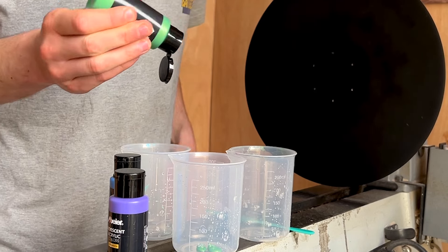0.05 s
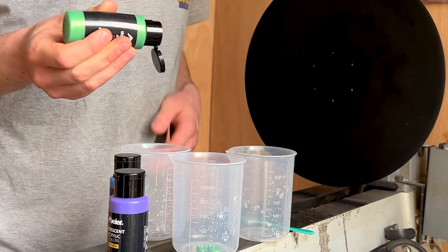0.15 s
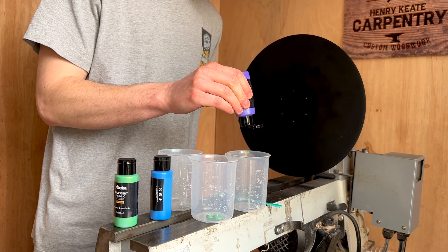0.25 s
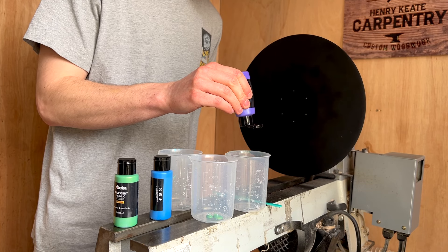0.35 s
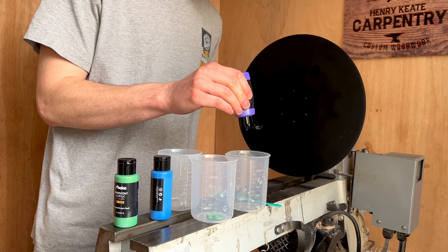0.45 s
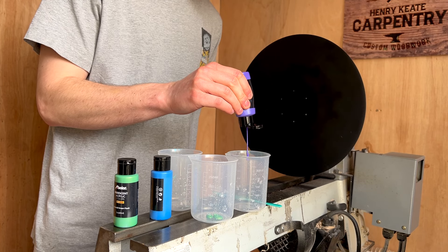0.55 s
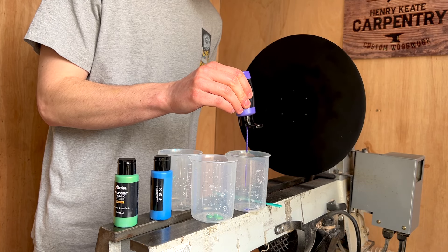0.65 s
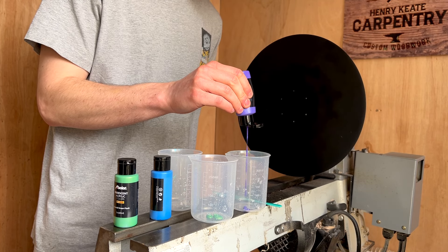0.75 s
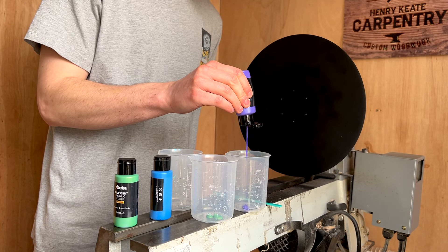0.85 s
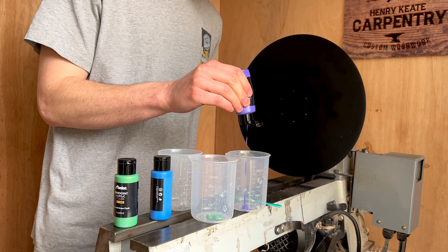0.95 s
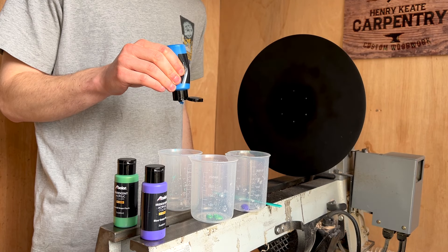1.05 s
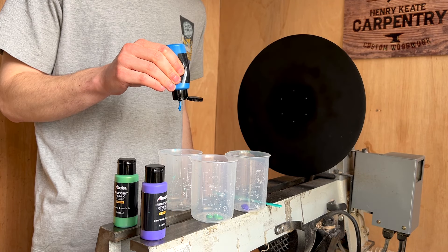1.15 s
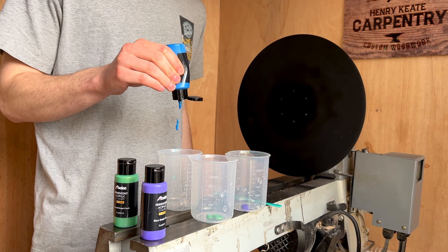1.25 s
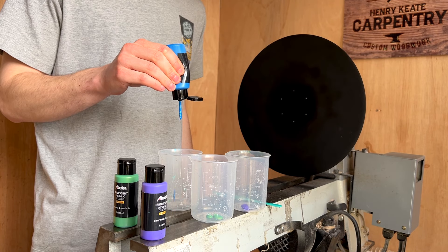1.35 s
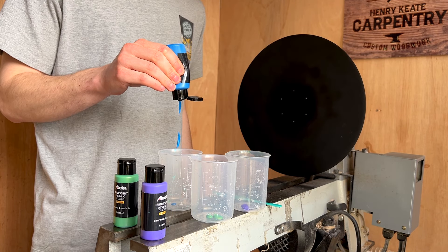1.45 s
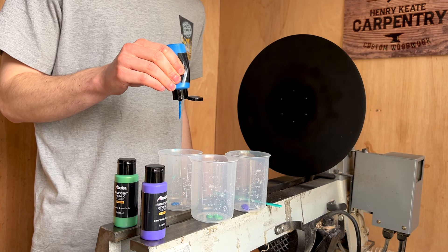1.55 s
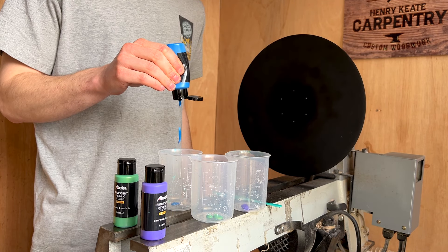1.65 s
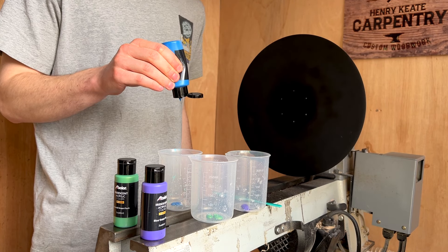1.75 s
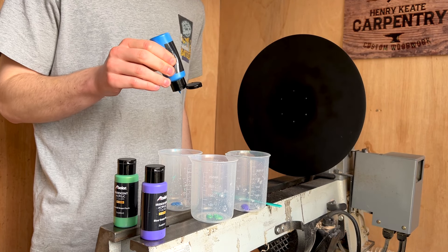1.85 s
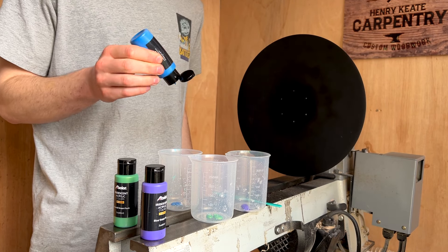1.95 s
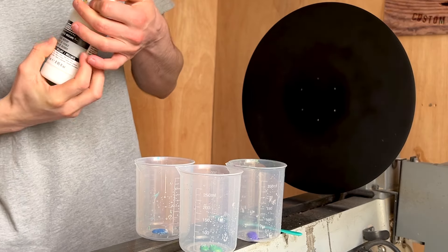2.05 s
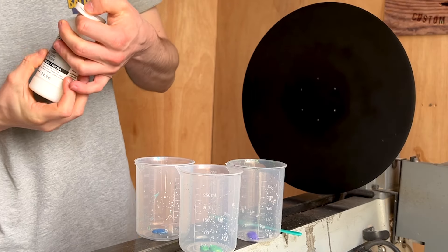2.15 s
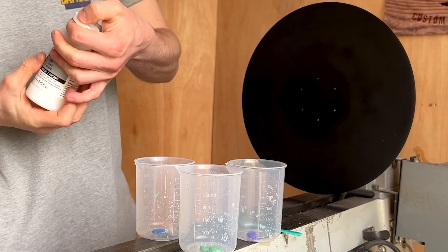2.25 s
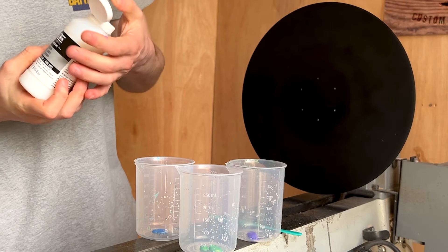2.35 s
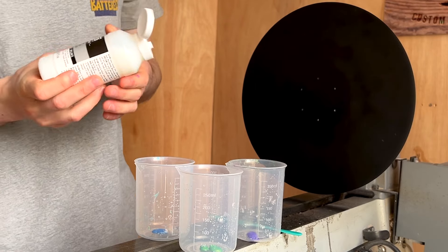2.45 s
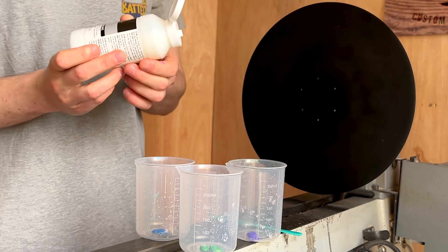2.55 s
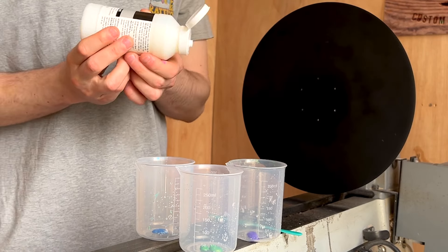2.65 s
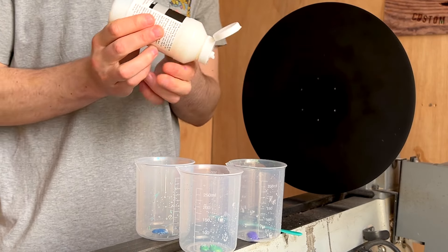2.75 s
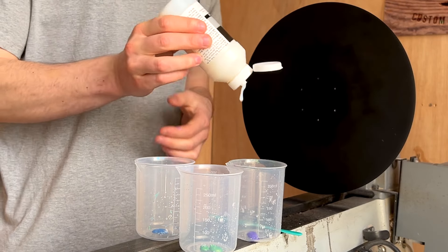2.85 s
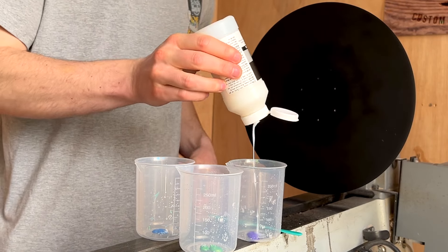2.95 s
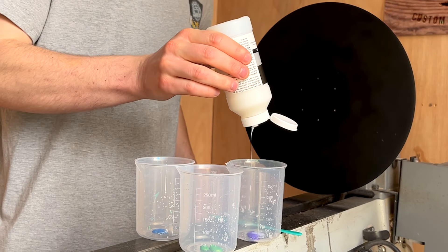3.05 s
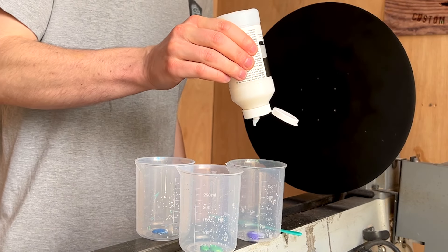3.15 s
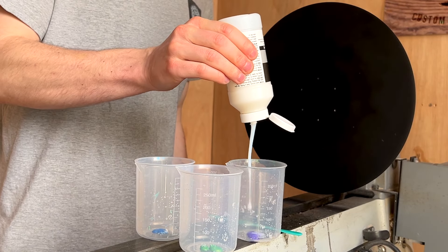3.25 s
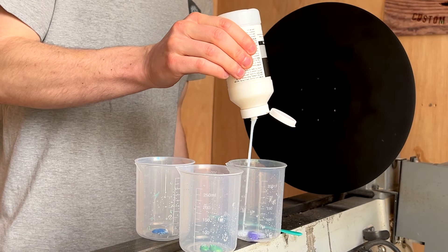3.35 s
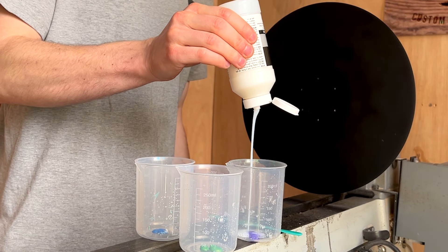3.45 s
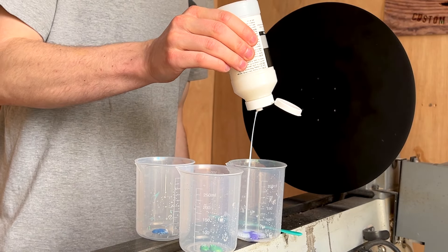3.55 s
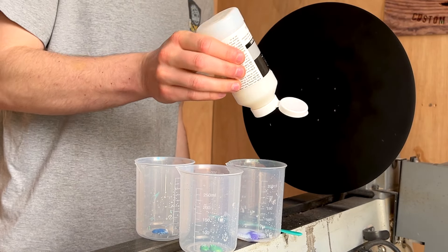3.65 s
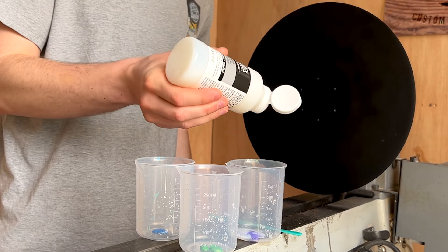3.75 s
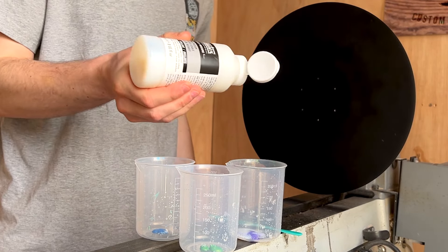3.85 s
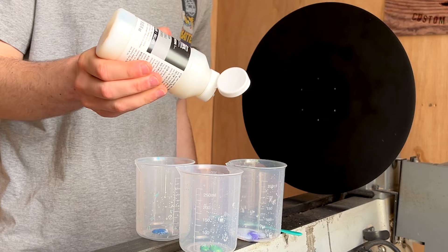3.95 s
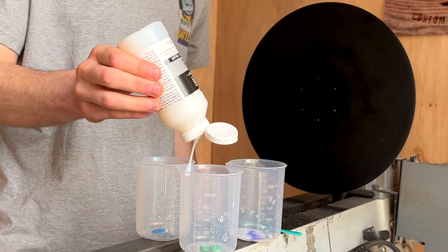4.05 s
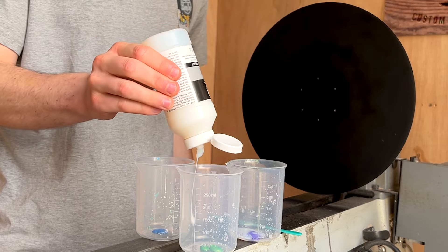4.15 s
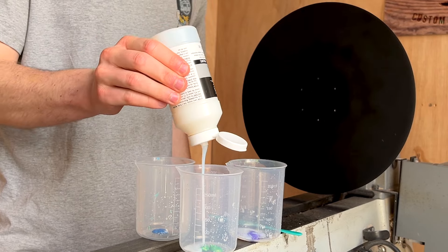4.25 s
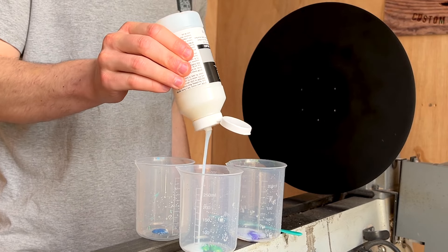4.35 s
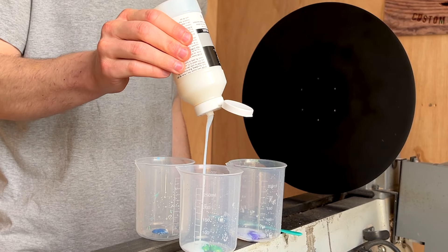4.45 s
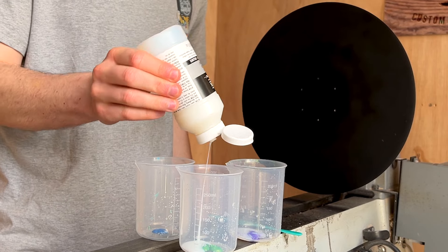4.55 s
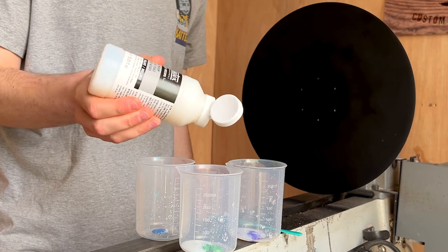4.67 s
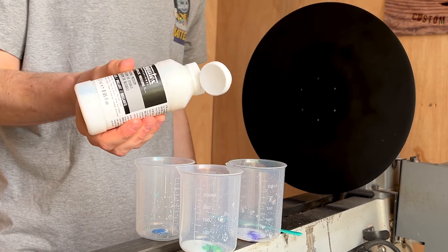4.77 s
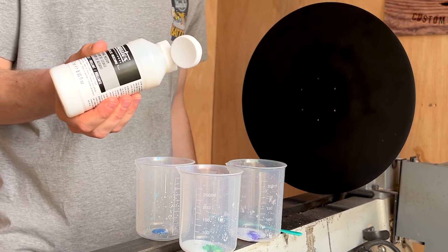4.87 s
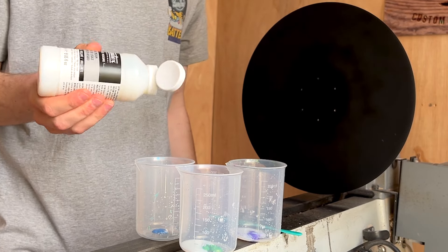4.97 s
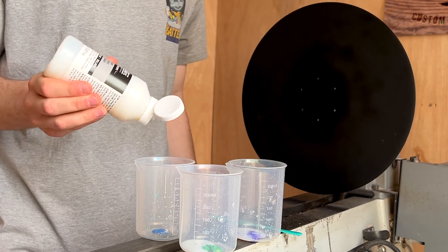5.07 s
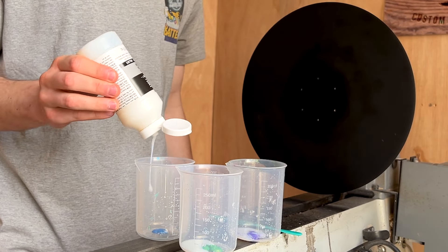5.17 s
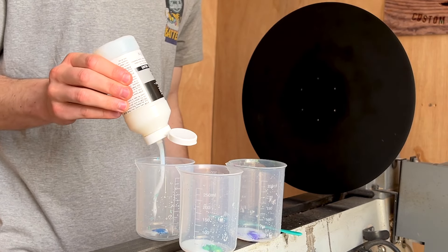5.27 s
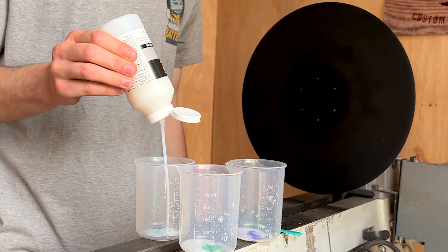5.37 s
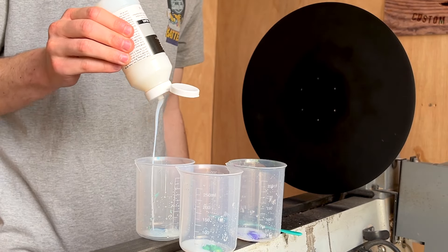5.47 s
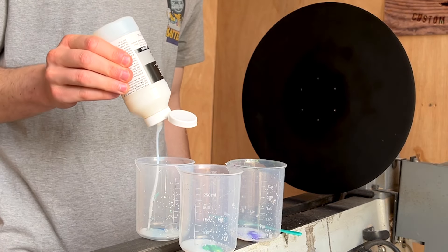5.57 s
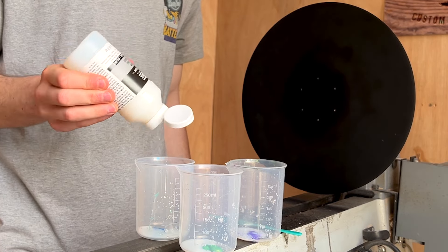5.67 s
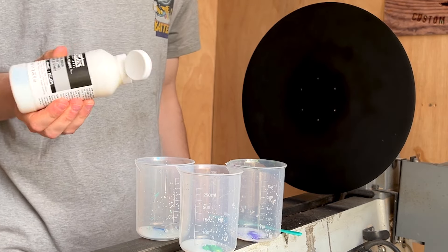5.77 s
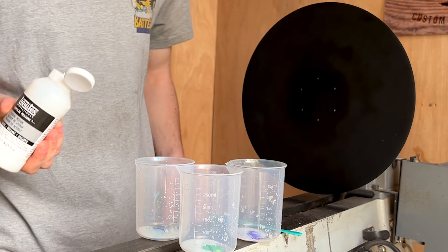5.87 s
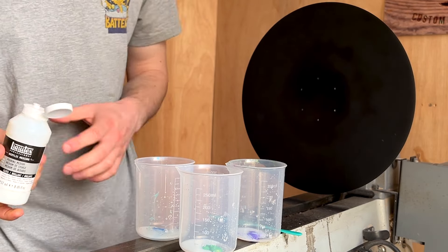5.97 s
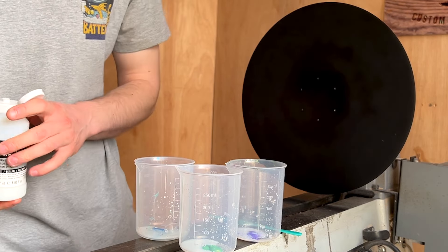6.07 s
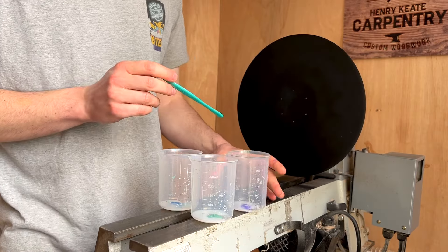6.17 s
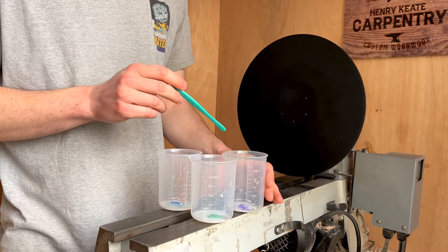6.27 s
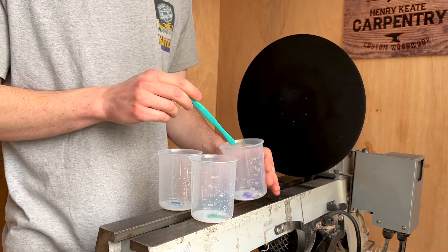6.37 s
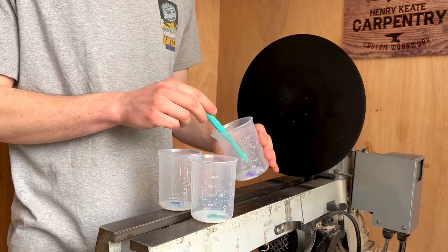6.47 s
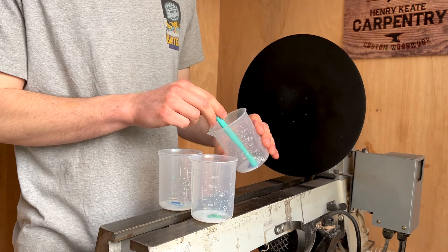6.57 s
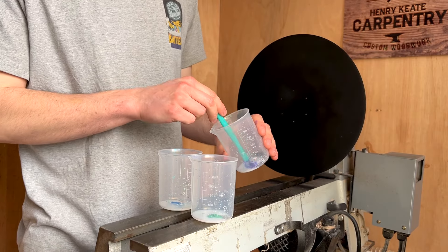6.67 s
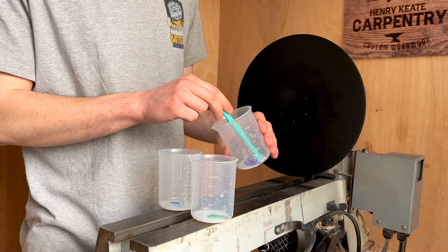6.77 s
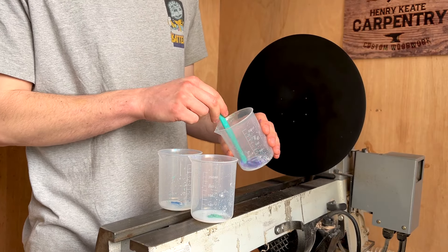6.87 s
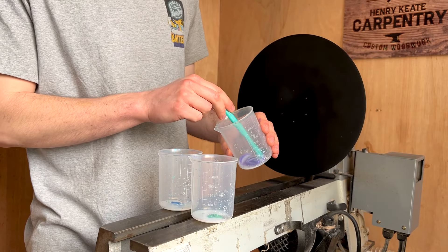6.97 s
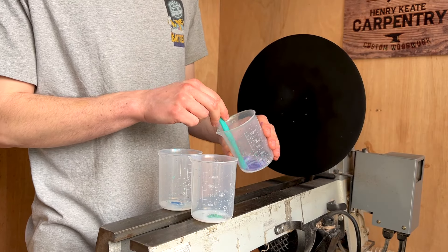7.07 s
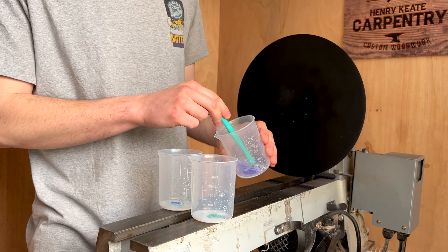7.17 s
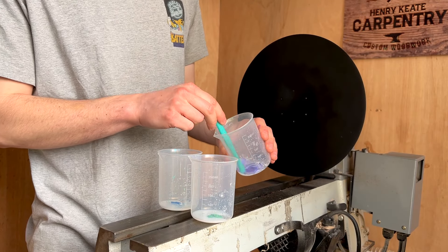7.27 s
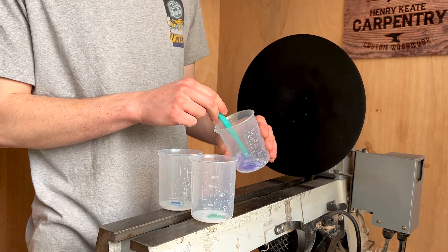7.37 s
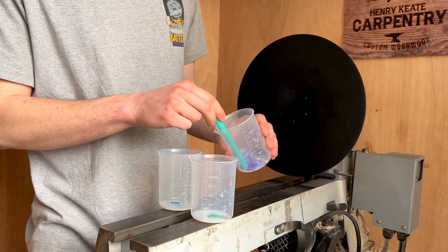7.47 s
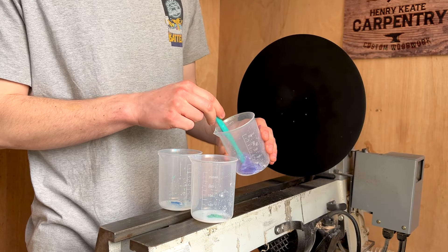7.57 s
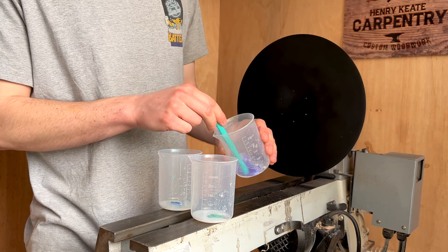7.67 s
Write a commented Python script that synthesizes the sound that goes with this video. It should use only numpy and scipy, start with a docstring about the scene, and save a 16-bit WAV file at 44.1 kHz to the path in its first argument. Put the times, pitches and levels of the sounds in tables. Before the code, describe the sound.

A small wooden workshop heard closely in stereo, with short dull echoes, quiet low rumble and air. A very faint hiss opens the first 0.3 seconds. Squeezed plastic bottles click softly at about 0.5, 0.65, 1.0, 1.4 and 1.55 seconds; at 1.7 a nozzle spits and splutters wetly. From 2.0 to 6.1 medium is poured: light rustles, a soft bump near 2.5, a barely audible squeak at 2.7, sparse bottle ticks at 3.0, 3.3, 4.3 and 5.2, and tiny rising wet pops around 3.5. A low hum gradually swells, then cuts off at 6.1. Light beaker taps come between 5.9 and 6.3, with rustling and a deep bump at 6.2. At 6.54 a stick gives the loudest hollow plastic knock, then stirs to the end, clustered knocks and gritty, ringing scrapes repeating roughly five times a second.

```python
"""In a small wooden workshop, paint is squeezed from plastic bottles into beakers: bottles click as resonant
shells, a nozzle sputters in bursts of tiny impacts, hands rustle and a few wet pops rise in pitch. After four
light knocks on beakers, a plastic stick stirs one of them: damped modes knock its bottom and stick-slip rubs
its wall five times a second. Near surfaces return dull echoes and the room rings briefly. Shaped noise gives a
faint opening hiss, rumble and air; the background changes at 2.045 s, a hum swells, and at 6.125 s the
background steps back."""
import sys
import numpy as np
from scipy import signal
from scipy.fft import rfft, irfft
from scipy.io import wavfile
from scipy.ndimage import uniform_filter1d

SR = 44100
rng = np.random.default_rng(int(sys.argv[2]) if len(sys.argv) > 2 else 0)


def digitize_waveform(pressure):
    """Quantize a signal to 16-bit integers and store it at the path in sys.argv[1].

    Rows of a 2-D input are taken as channels; values are limited to [-1, 1].
    """
    field = np.atleast_2d(pressure).T
    bounded = np.clip(field, -1, 1)
    quanta = np.round(bounded * 32767).astype(np.int16)
    wavfile.write(sys.argv[1], SR, quanta)


N = 340452
T = np.arange(N) / SR
RING = T[:8192]  # time axis of one hit


def undb(db):
    """Level law: decibels to amplitude gain."""
    return 10 ** (np.asarray(db) / 20)


def along(points, hz):
    """Logarithmic frequency scale: interpolate (frequency_hz, value) points on it."""
    f, value = np.transpose(points)
    return np.interp(np.log(np.maximum(hz, 1)), np.log(f), value)


def impulse(points, size=1024):
    """Minimum phase: folding the cepstrum gives the most compact causal click of a spectrum, at unit energy."""
    hz = np.arange(size // 2 + 1) * SR / size
    log_gain = along(points, hz) * np.log(10) / 20
    cepstrum = irfft(log_gain)
    cepstrum[1:size // 2] *= 2
    cepstrum[size // 2 + 1:] = 0
    h = irfft(np.exp(rfft(cepstrum)))
    return h / np.linalg.norm(h)


def through(x, response):
    """Linear system: convolve a sound with an impulse response."""
    return signal.fftconvolve(x, response)[:len(x)]


def blow(x, count=132):
    """Short-time power: scale a hit so that its loudest 3 ms (132 samples) have rms 1."""
    power = uniform_filter1d(x ** 2, count, mode="constant")
    return x / np.sqrt(power.max())


def add(track, start_s, x):
    """Superposition: mix x into the track from start_s."""
    i = int(start_s * SR)
    track[i:i + len(x)] += x[:max(N - i, 0)]


def fade(t60):
    """Exponential damping: amplitude falls by 60 dB in t60 seconds."""
    return np.exp(-np.log(1000) * RING / t60)


def ring(modes, scatter_db=3, detune=0.013):
    """Modal excitation: a random striking spot sets level and sign; fingers and paint shift pitch a little."""
    chance = rng.standard_normal((len(modes), 3))
    total = 0
    for (hz, db, t60), (level, shift, sign) in zip(modes, chance):
        gain = undb(db + scatter_db * level) * np.sign(sign)
        pitch_hz = hz * (1 + detune * shift)
        total = total + gain * fade(t60) * np.sin(2 * np.pi * pitch_hz * RING)
    return total


def throb(hz, swell_s, steep):
    """Heavy damping: an oscillation peaks at swell_s and soon dies."""
    u = RING / swell_s
    envelope = (u * np.exp(1 - u)) ** abs(steep)
    return envelope * np.sin(2 * np.pi * hz * RING)


def crack(colour, t60):
    """Contact noise: a decaying random burst takes on a spectrum."""
    burst = rng.standard_normal(len(RING)) * fade(t60)
    return blow(through(burst, impulse(colour)))


def slips(rate, spread_db):
    """Shot noise: random impacts, on average rate per second, of uneven size and either sign, at rms 1."""
    happens = rng.random(N) < rate / SR
    size = undb(spread_db * np.clip(rng.standard_normal(N), -2, 2))
    x = happens * rng.choice([-1, 1], N) * size
    return x / x.std()


def swell(peak_s, rise, fall, db):
    """Gaussian envelope: a smooth rise to a level and fall from it, with widths in seconds."""
    width = np.where(T < peak_s, rise, fall)
    return undb(db) * np.exp(-.5 * ((T - peak_s) / width) ** 2)


def wander(rate):
    """Random modulation: straight lines join normal random values drawn rate times per second."""
    k = int(SR / rate)
    knots = N // k + 2
    return np.interp(T, np.arange(knots) * k / SR, rng.standard_normal(knots))


def air(colour, db, wide_hz=450):
    """Diffuse-field coherence: steady noise is alike on both sides in the bass and wide well above wide_hz."""
    hz = np.arange(N // 2 + 1) * SR / N
    mid, side = rfft(rng.standard_normal((2, N))) * undb(along(colour, hz))
    mid, side = irfft(mid, N), irfft(side * hz / (hz + abs(wide_hz)), N)
    return np.array([mid + side, mid - side]) * undb(db) / mid.std()


# noise spectrum before 2.045 s and after 6.125 s: frequency_hz, relative density_db
EARLY_AIR = [(15, -33), (25, -7.5), (66, -2.5), (278, -21.5), (301, -29), (326, -25.5), (833, -36.5),
             (1720, -42.5), (8100, -49.5), (10000, -58), (15000, -47)]
# noise spectrum from 2.045 s to 6.125 s: frequency_hz, relative density_db
MIDDLE_AIR = [(15, -97), (25, -35.5), (69, -7), (86, -12.5), (106, -2), (301, -16.5), (427, -21), (475, -24),
              (1760, -40), (3540, -45), (5420, -49.5), (10000, -49), (15000, -57)]
MIDDLE_START_S, MIDDLE_END_S = 2.045, 6.125
EARLY_DB, MIDDLE_DB, LATE_DB = -66, -65.5, -64  # rms of the part shared by both sides
HUM_HZ = 102.3
HUM_FAINT_DB, HUM_END_DB, HUM_SWELL_DB_PER_S = -79.5, -60, 7.5


def background():
    """Stationary noise and phase modulation: rumble and air, with a different noise and a wavering hum from
    2.045 s to 6.125 s."""
    middle = (T > MIDDLE_START_S) & (T < MIDDLE_END_S)
    rumble = air(EARLY_AIR, 0) * undb(np.where(T < MIDDLE_END_S, EARLY_DB, LATE_DB))
    waver = signal.resample(rng.standard_normal(64), N)
    # faint at first, then a steady swell until the background steps back
    hum_db = np.maximum(HUM_FAINT_DB, HUM_END_DB - HUM_SWELL_DB_PER_S * (MIDDLE_END_S - T))
    hum = np.sqrt(2) * np.sin(2 * np.pi * HUM_HZ * T + 0.5 * waver) * undb(hum_db)
    return np.where(middle, air(MIDDLE_AIR, MIDDLE_DB) + hum, rumble)


# echoes off the bench and near wall, left list then right: delay_s, level_db (before the colour below)
ECHOES = [
    [(.0139, 0), (.0178, -14)],
    [(.0128, -8), (.0194, -3.5)],
]
# echo spectrum: frequency_hz, level_db
ECHO_COLOUR = [(200, -10.5), (500, -10.5), (750, 0), (1000, -8), (1500, -11.5), (4000, -18.5), (12000, -29)]
# diffuse room: frequency_hz, level_db, t60_s
ROOM = [(100, -9, 0.37), (280, -2.5, 0.19), (720, -3, 0.21), (1470, -2.5, 0.18), (3330, -3, 0.2),
        (6900, 0.5, 0.19), (14000, -5, 0.13)]
# how much more the bench radiates to the left than to the right: frequency_hz, level_db
LEFT_BIAS = [(100, -0.5), (200, -10), (380, 13), (720, -14), (1300, 12), (2400, -3.5), (4400, 6),
             (8000, 4.5), (14000, 0)]
# phase by which the left microphone leads the right: frequency_hz, phase_rad
LEFT_LEAD = [(100, -0.35), (900, 1), (2200, 0.88), (4200, 1.5), (6300, 1.27), (9500, -3), (13000, -5.5),
             (16000, -8)]


def workshop(x, noise, echoes, side, build_s=0.0017):
    """Room response: direct sound, early reflections and diffuse decay at one microphone (1 left, -1 right)."""
    size = len(noise)
    t, hz = T[:size], np.arange(size // 2 + 1) * SR / size
    # each microphone takes half of the level and phase difference; the direct path lasts 20 samples
    bias = undb(side * along(LEFT_BIAS, hz) / 2)
    direct = bias * np.exp(.5j * side * along(LEFT_LEAD, hz) - 2j * np.pi * hz * 20 / SR)
    early = sum(undb(db) * np.exp(-2j * np.pi * hz * delay_s) for delay_s, db in echoes)
    h = irfft(direct + early * undb(along(ECHO_COLOUR, hz)))
    h[size // 2:] = 0  # near surfaces answer only early
    room = np.array(ROOM)
    spectrum = rfft(noise)
    edges = np.geomspace(40, 18000, 19)
    for lo, hi in zip(edges, edges[1:]):
        centre = np.sqrt(lo * hi)
        t60 = along(room[:, ::2], centre)
        band = irfft(spectrum * (hz >= lo) * (hz < hi))
        band = band * (1 - np.exp(-(t / build_s) ** 2)) * np.exp(-np.log(1000) * t / t60)
        share = np.sqrt(2 * (hi - lo) / SR)  # energy in proportion to bandwidth
        h = h + band / np.linalg.norm(band) * share * undb(along(room[:, :2], centre))
    return through(x, h)


SQUEAK_S, SQUEAK_HZ, SQUEAK_DB = 2.66, 2840, -79


def squeak(rise_s=.02, fall_s=0.027):
    """Stick-slip: a finger on the big bottle faintly excites one narrow resonance."""
    mode = fade(t60=0.011) * np.sin(2 * np.pi * SQUEAK_HZ * RING)
    skin = slips(rate=1500, spread_db=2) * swell(SQUEAK_S, rise_s, fall_s, SQUEAK_DB)
    return through(skin, mode / np.linalg.norm(mode))


POP_START_S, POP_END_S = 3.35, 3.72
POP_HZ, POP_DB = 1590, -68  # middle pitch, and upper limit of level


def stream(bend_per_s=3, count=5):
    """Bubble resonance: air pockets pop faintly in the thick stream as the medium runs out, rising in pitch."""
    out = np.zeros(N)
    for when, pitch, size in rng.random((count, 3)):
        hz = POP_HZ * 2 ** ((pitch - .5) / 2)  # within a quarter octave of the middle
        # bending the phase raises the pitch at twice bend_per_s
        blip = fade(t60=.03) * np.sin(2 * np.pi * hz * RING * (1 + bend_per_s * RING))
        add(out, POP_START_S + when * (POP_END_S - POP_START_S), undb(POP_DB - 7.1 * size) * blip)
    return out


# rustles of hands on plastic and cloth; the first row is a faint hiss at the start: start_s, length_s, level_db
RUSTLES = [(0, .28, -85), (2.032, .05, -73), (2.148, 0.16, -71), (2.547, .035, -77), (2.753, 0.097, -75),
           (5.922, .025, -67.5), (6.017, 0.096, -69), (6.13, 0.18, -63), (6.174, 0.033, -55),
           (6.376, 0.19, -80.5)]
# spectrum of rustle and opening hiss: frequency_hz, level_db
RUSTLE_COLOUR = [(150, 9.5), (400, 9.5), (800, 12.5), (1300, -1.5), (3000, -0.5), (6000, -2.5),
                 (9000, -2.5), (15500, -8)]
# dull bumps as things are handled: start_s, level_db, pitch_hz, swell_s
BUMPS = [(2.485, -27.5, 186, 0.0052), (2.48, -46, 473, 0.002), (6.203, -35, 222, 0.0045),
         (6.207, -24.5, 85.5, 0.011), (6.23, -32.5, 150, 0.0069)]
RUSTLE_ATTACK_S, RUSTLE_RELEASE_S = 0.012, .012  # linear rise, time constant of the decay


def hands(rustle_db=0, uneven_db=4, bump_hz=45):
    """Shot noise and damped oscillation: a faint opening hiss, uneven rustles of hands, and dull bumps."""
    strength = 0
    for start_s, length_s, db in RUSTLES:
        attack = np.clip((T - start_s) / RUSTLE_ATTACK_S, 0, 1)
        release = np.exp(-np.maximum(T - start_s - length_s, 0) / RUSTLE_RELEASE_S)
        strength = strength + undb(db) * attack * release
    grain = through(slips(rate=1600, spread_db=2.5), impulse(RUSTLE_COLOUR))
    rustle = grain * strength * undb(rustle_db + uneven_db * wander(rate=51))
    bumps = np.zeros(N)
    for start_s, db, hz, swell_s in BUMPS:
        add(bumps, start_s, undb(db) * throb(hz, swell_s, steep=2.96))
    # small objects radiate little deep bass
    return rustle + signal.sosfilt(signal.butter(2, bump_hz, "high", fs=SR, output="sos"), bumps)


# air spits through the nozzle, then wet paint splutters: peak_s, rise_s, fall_s, level_db, pops_per_s
SQUIRT = [(1.687, 0.0062, .012, -47.5, 3000), (1.709, 0.0097, 0.011, -44.5, 1000)]
# spectrum of the spit: frequency_hz, level_db
SPIT_COLOUR = [(120, -40), (200, -11), (683, 1), (1910, -1.5), (3370, -10.5), (8740, -11), (9580, -20),
               (10100, -39), (11300, -10.5), (16000, -15)]
# spectrum of the splutter: frequency_hz, level_db
SPLUTTER_COLOUR = [(120, -16), (300, -7), (700, -6), (1200, 3.5), (1900, -3.5), (2600, -11), (5000, -19),
                   (12000, -46)]


def nozzle():
    """Shot noise: fine spray, then coarser pops of paint bursting at the opening."""
    out = 0
    for (peak_s, rise, fall, db, rate), colour in zip(SQUIRT, [SPIT_COLOUR, SPLUTTER_COLOUR]):
        pops = slips(rate, spread_db=4.5) * swell(peak_s, rise, fall, db)
        out = out + through(pops, impulse(colour))
    return out


# squeezed bottles flex and click: start_s, level_db, shell_centre_hz, t60_s, sharpness_db
CLICKS = [(.492, -66, 1930, 0.18, -14), (.543, -72, 1900, 0.085, -7), (.647, -64, 2150, 0.054, -12),
          (1.027, -69.5, 1774, 0.046, -2.5), (1.378, -58, 1905, 0.073, -17), (1.553, -71, 1640, 0.15, -1.5),
          (2.327, -64.5, 2240, .06, 8), (2.473, -63, 2280, 0.092, -3), (2.965, -55.5, 1866, 0.014, -20),
          (3.304, -52.5, 1830, 0.0042, -7), (4.038, -79, 1250, 0.043, 8), (4.264, -57, 2470, .025, -5.5),
          (5.051, -83.5, 1610, 0.06, 19.5), (5.232, -64, 2380, 0.029, -2.5), (5.86, -63.5, 3780, .023, 0),
          (6.082, -54.5, 2030, 0.026, -3.5), (6.132, -60, 1690, 0.17, -9)]
# spectrum of the shell's click: multiple of the centre, level_db
SHELL = [(.25, -45), (.52, -18), (.68, 6.5), (1.25, 5.5), (1.7, -2.5), (2.2, -11), (3, -7.5), (6, -36.5)]
# resonances of a bottle's shell: multiple of the centre, level_db, t60_s
SHELL_MODES = [(0.741, -16, 0.031), (0.821, 1.5, 0.035), (0.999, 10, 0.033), (1.269, -13, 0.03),
               (1.6, -12, .02), (2.4, 3, 0.016), (2.9, 6, 0.016)]
# spectrum of the hollow body: frequency_hz, level_db
HOLLOW = [(200, -11), (450, -8), (700, -3), (1100, 1.5), (1800, -13), (6000, -39)]
# spectrum of the bottle's tick: frequency_hz, level_db
BOTTLE_TICK = [(1000, -16), (3000, -23), (4300, 3.5), (5200, 1.5), (6200, 1), (7500, -5.5), (9500, 6),
               (15000, -2.5)]
FULL_BODY_T60_S = 0.048  # a flex this slow moves the whole hollow body; quicker ones move it less


def bottles(shell_db=-2, ring_db=-8, body_db=-5, tick_db=-1):
    """Shell resonance: a flexing bottle clicks and rings; slow flexes last longer and move more of its body."""
    out = np.zeros(N)
    for start_s, db, hz, t60, sharpness in CLICKS:
        click = crack([(hz * k, gain) for k, gain in SHELL], t60)
        modes = ring([(hz * k, gain, decay) for k, gain, decay in SHELL_MODES], detune=0.05)
        shell = undb(shell_db) * click + undb(ring_db) * blow(through(click, modes))
        body = undb(body_db) * min(t60 / FULL_BODY_T60_S, 1) ** 2 * crack(HOLLOW, t60)
        tick = undb(tick_db + sharpness) * crack(BOTTLE_TICK, t60 / 2)
        add(out, start_s, undb(db) * (shell + body + tick))
    return out


# once a turn the stick is dragged along the wall: peak_s, rise_s, pressure_db, grip_db (low: glides on paint)
STROKES = [(6.767, 0.032, -52, -13), (6.876, 0.011, -40, 8), (7.095, 0.016, -38.5, 1.5),
           (7.303, .017, -40.5, -0.5), (7.512, .019, -39.5, 1), (7.712, 0.027, -47.5, 1.5)]
# low modes of the beaker wall, also rung by the knocks: pitch_hz, level_db, t60_s
WALL_LOW = [(1090, 3.5, 0.047), (1140, -5.5, 0.036), (1516, 0, 0.024), (1680, -2, 0.026), (1903, 0, 0.017),
            (2130, -5.5, 0.0059), (2374, -15.5, 0.051)]
# high modes of the beaker wall, also rung by the knocks: pitch_hz, level_db, t60_s
WALL_HIGH = [(2726, -6, 0.027), (2844, -6, 0.036), (3142, 4, 0.062), (3244, -4, 0.078), (3414, -6, 0.044),
             (3630, -8.5, 0.025), (3785, 0.5, 0.05), (3930, -5, 0.052), (4650, -6.5, .04),
             (5360, -5.5, 0.058)]
# spectrum of the rubbing: frequency_hz, level_db
RUB = [(150, -25.5), (500, -9.5), (1000, 4), (2400, -7.5), (3300, 5.5), (5300, -4), (6200, -4.5),
       (7500, -9.5), (8800, -9.5), (10100, -28), (11800, -14.5), (15500, -23)]
STROKE_FALL_S = .014  # the stick leaves the wall quickly
CHATTER_HZ, CHATTER_PER_S = 783.5, 200  # a gripping stick hops and drums the bottom


def scrapes(hiss_db=-1, ring_db=-2, catch_db=4, chatter_db=-1):
    """Stick-slip: the stick makes the wall hiss and ring, differently each stroke, and chatters on the bottom."""
    grit = slips(rate=1500, spread_db=3.5) * undb(catch_db * wander(rate=130))
    hops = slips(rate=CHATTER_PER_S, spread_db=8)
    bottom = throb(CHATTER_HZ, swell_s=0.00327, steep=3.2)
    total_pressure, drag, ringing = 0, 0, 0
    for peak_s, rise, db, grip in STROKES:
        pressure = swell(peak_s, rise, STROKE_FALL_S, db)
        # the pressing stick damps the wall
        wall = ring(WALL_LOW + WALL_HIGH, scatter_db=4.0, detune=0.019) * fade(t60=0.055)
        wall = wall / np.linalg.norm(wall)
        ringing = ringing + through(grit * pressure * undb(grip + ring_db), wall)
        total_pressure = total_pressure + pressure
        drag = drag + pressure * undb(grip)
    chatter = undb(chatter_db) * through(hops * drag, bottom / np.linalg.norm(bottom))
    hiss = undb(hiss_db) * through(grit * total_pressure, impulse(RUB))
    return ringing + chatter + hiss


# knocks on the beakers, the first four light, the rest by the stirring stick:
# start_s, level_db, bottom_pitch_hz, hardness_db (below 0 cushioned, by paint when stirring; above 0 bare plastic)
KNOCKS = [(5.936, -56, 630, 6.5), (6.032, -54.5, 640, -14), (6.246, -45.5, 787, -6),
          (6.287, -46.5, 730, 4.5), (6.5443, -14, 792, -2), (6.684, -26.5, 823, -4), (6.863, -29, 873, 6),
          (6.883, -34, 790, -7), (7.003, -27.5, 806, -2), (7.066, -27, 780, -6),
          (7.087, -21.5, 765.4, -1.5), (7.238, -43.5, 754, 23.5), (7.278, -31.5, 760, -8),
          (7.296, -24, 773, -5), (7.305, -21.5, 756, -8), (7.439, -24, 838, -1.5), (7.485, -26, 852, -13),
          (7.506, -22.5, 714, -0.5), (7.653, -29.5, 755, 4), (7.69, -35.5, 815, -2)]
# side modes of a beaker's bottom that ring on after a knock: pitch_hz, level_db, t60_s
BOTTOM_MODES = [(649.6, -14.5, 0.059), (858, -10, 0.058)]
# spectrum of a knock's tick: frequency_hz, level_db
TICK = [(150, -24), (400, -2.5), (900, -6), (2300, -23.5), (4300, 9.5), (5300, 0), (6100, 4), (7200, 6),
        (8700, -4), (10100, -24), (11800, -1), (15500, -60)]
# spectrum of a knock's first hard snap: frequency_hz, level_db
SNAP = [(120, -42), (350, -12), (1500, -2), (2500, -3), (4300, 4.5), (7200, -8), (9000, -8), (10100, -20.5),
        (12000, -9), (15500, -29)]
HIGH_DB_PER_HARDNESS = 0.5569  # a harder contact rings the high wall modes more


def knocks(bottom_db=0.74, low_db=-15, high_db=-15, tick_db=-21, snap_db=-18, build_s=0.0029):
    """Impact excitation: each knock drums bottom and cavity and rings the wall; hard contacts snap and tick more."""
    out = np.zeros(N)
    for start_s, db, hz, hardness in KNOCKS:
        # the bottom swells with the cavity; its side modes build up and ring on a little
        after = ring(BOTTOM_MODES, scatter_db=3.5, detune=0.011) * (1 - np.exp(-RING / build_s))
        bottom = undb(bottom_db) * (throb(hz, swell_s=0.0036, steep=2.73) + after)
        low = undb(low_db) * blow(ring(WALL_LOW, detune=0.012))
        high_modes = blow(ring(WALL_HIGH, scatter_db=4.5, detune=0.0158))
        high = undb(high_db + HIGH_DB_PER_HARDNESS * hardness) * high_modes
        contact = undb(tick_db) * crack(TICK, t60=0.049) + undb(snap_db) * crack(SNAP, t60=0.0038)
        add(out, start_s, undb(db) * (bottom + low + high + undb(hardness) * contact))
    return out


def scene():
    """Superposition: all work sounds from one spot on the bench reach two microphones through the room."""
    work = squeak() + stream() + hands() + nozzle() + bottles() + scrapes() + knocks()
    diffuse = air([(20, 0), (20000, 0)], 0, wide_hz=150)[:, :2 * len(RING)]
    left = workshop(work, diffuse[0], ECHOES[0], side=1)
    right = workshop(work, diffuse[1], ECHOES[1], side=-1)
    return background() + np.array([left, right])


TOP_HZ = 15900


def record(dry):
    """Band limiting: the recorder cuts the top with a steep elliptic low-pass."""
    return signal.sosfilt(signal.ellip(8, .2, 70, TOP_HZ, fs=SR, output="sos"), dry)


dry = scene()
out = record(dry)
digitize_waveform(out)
```